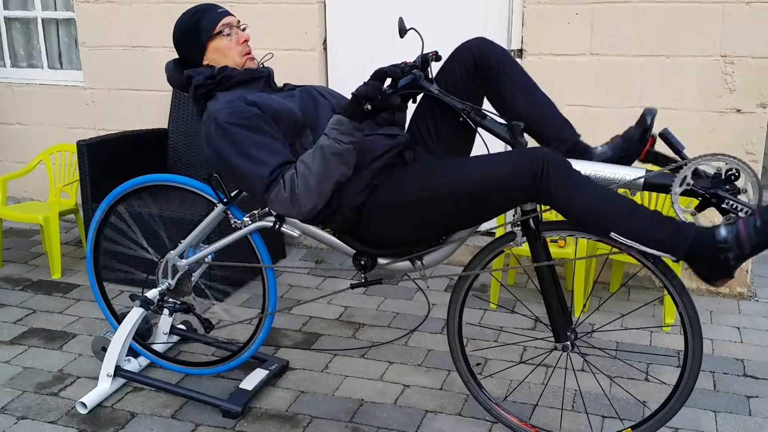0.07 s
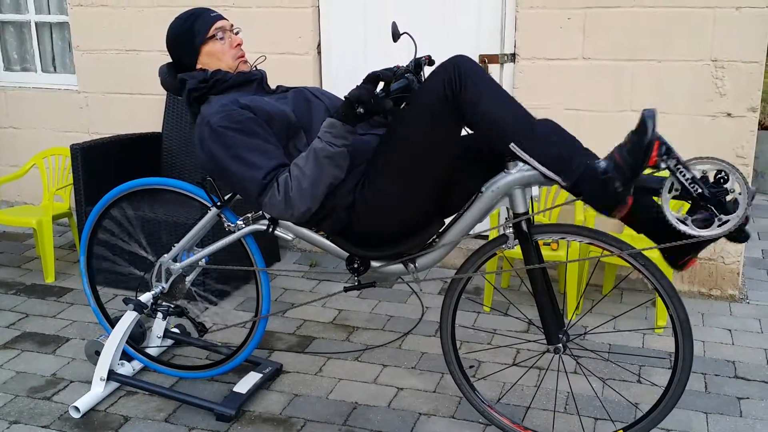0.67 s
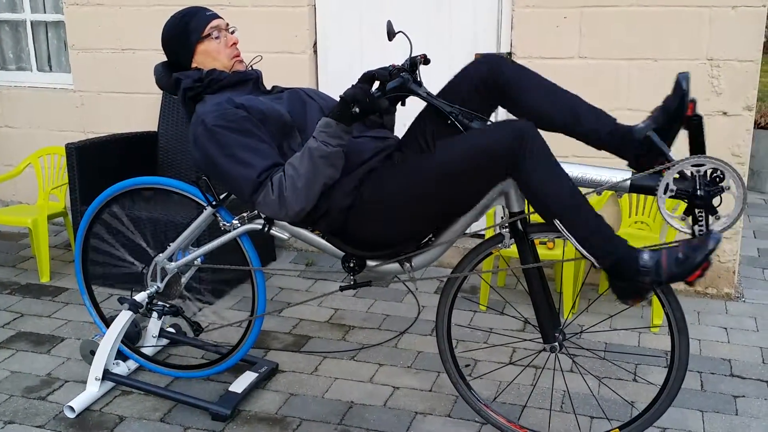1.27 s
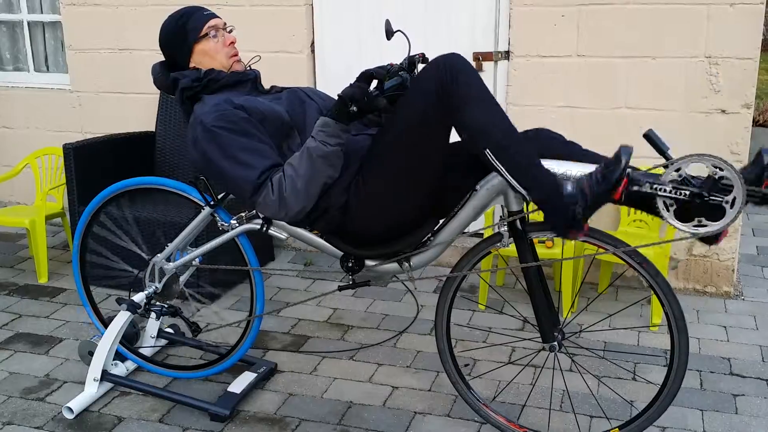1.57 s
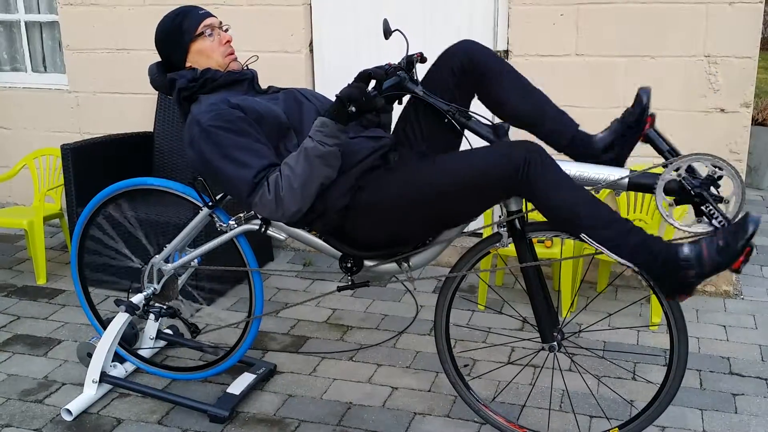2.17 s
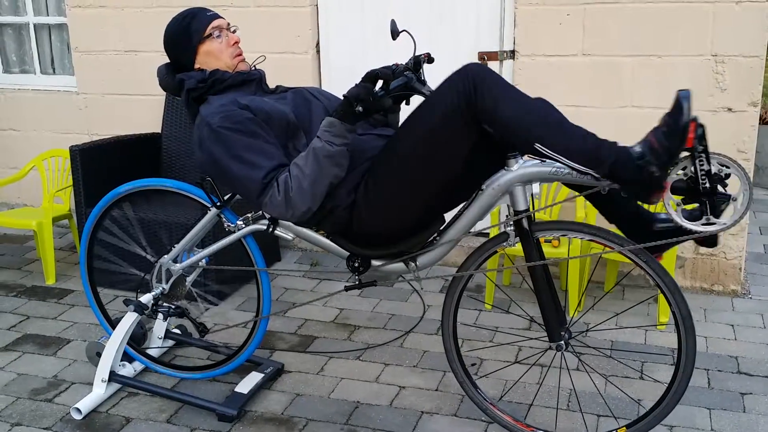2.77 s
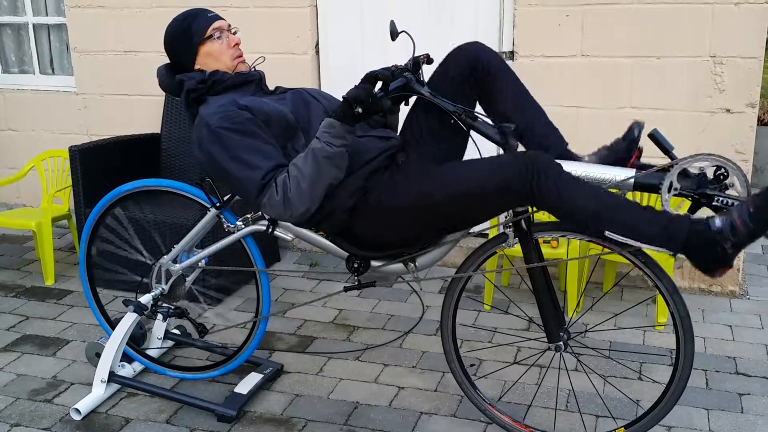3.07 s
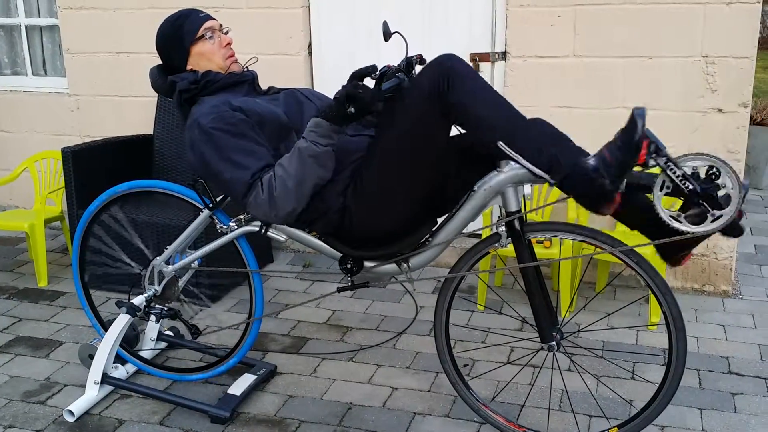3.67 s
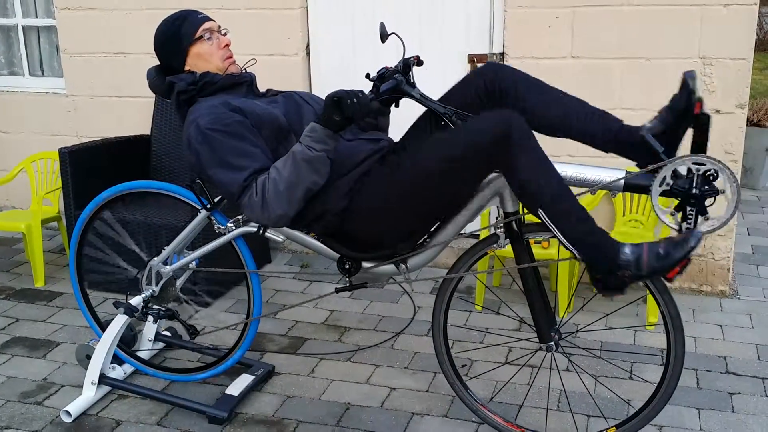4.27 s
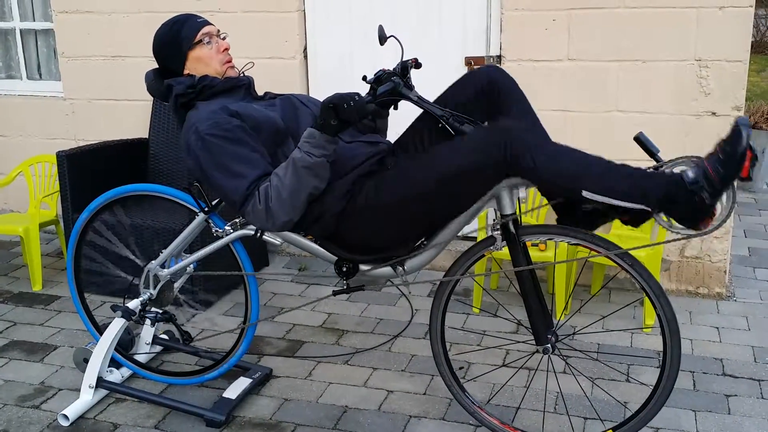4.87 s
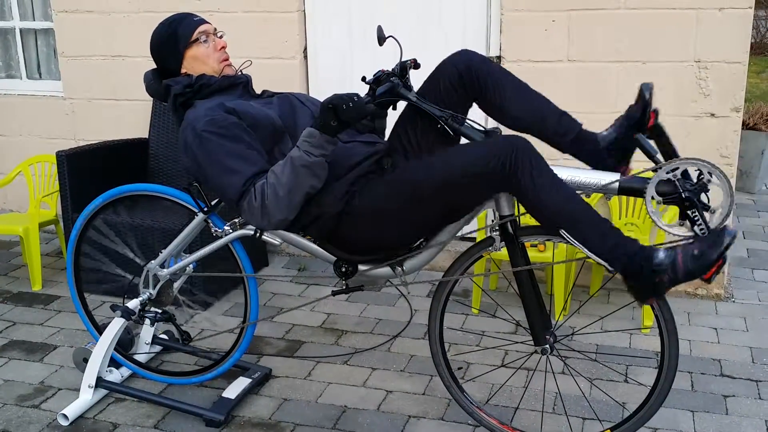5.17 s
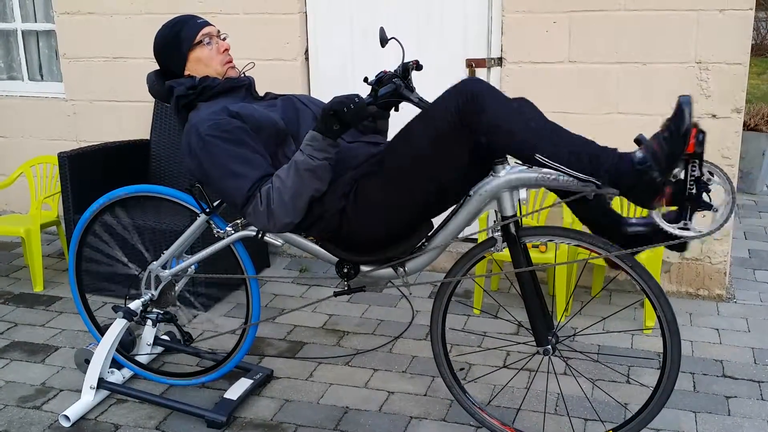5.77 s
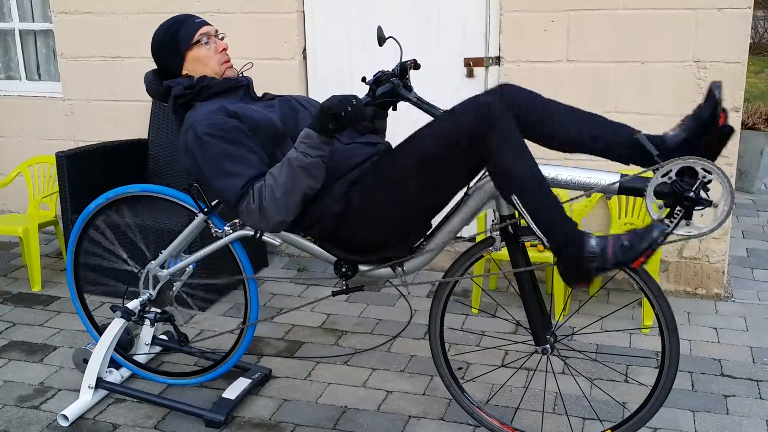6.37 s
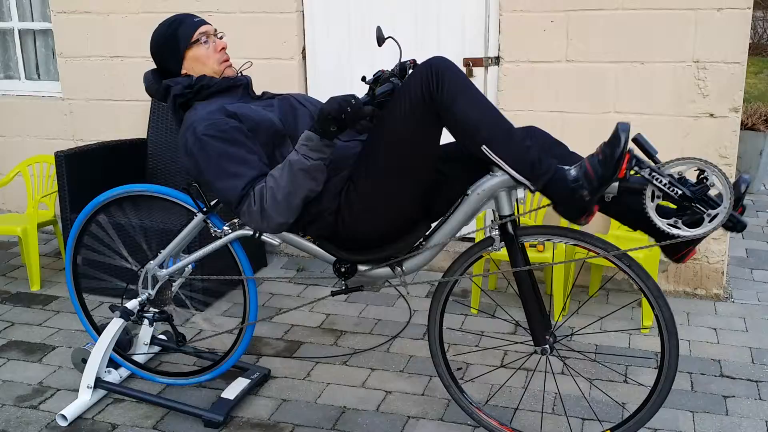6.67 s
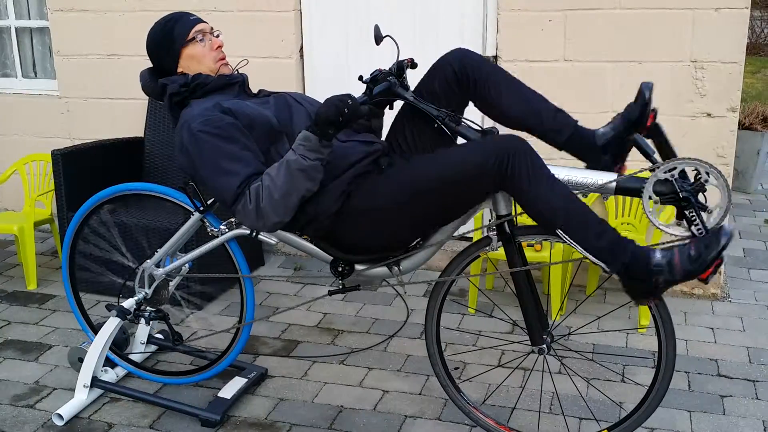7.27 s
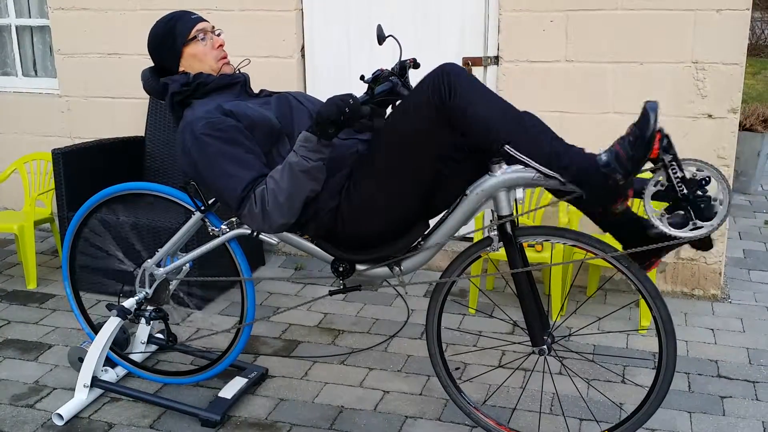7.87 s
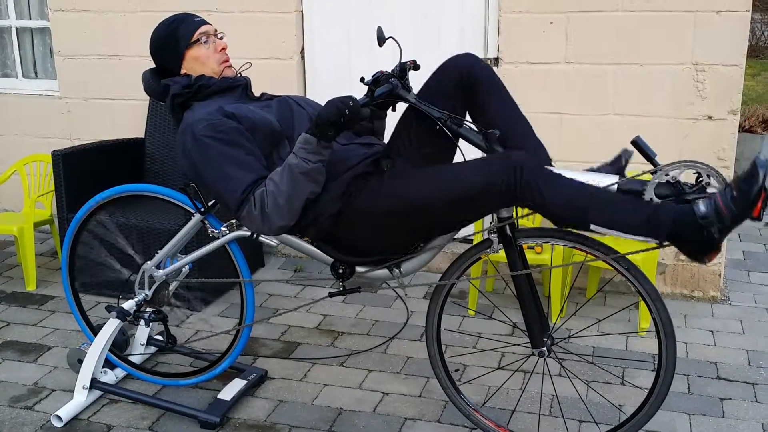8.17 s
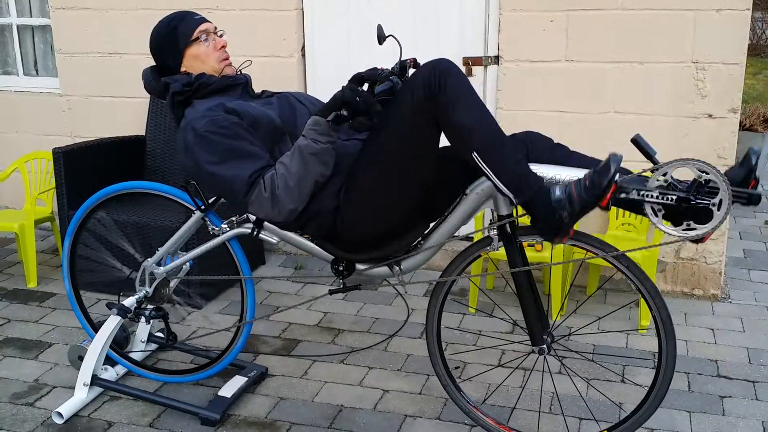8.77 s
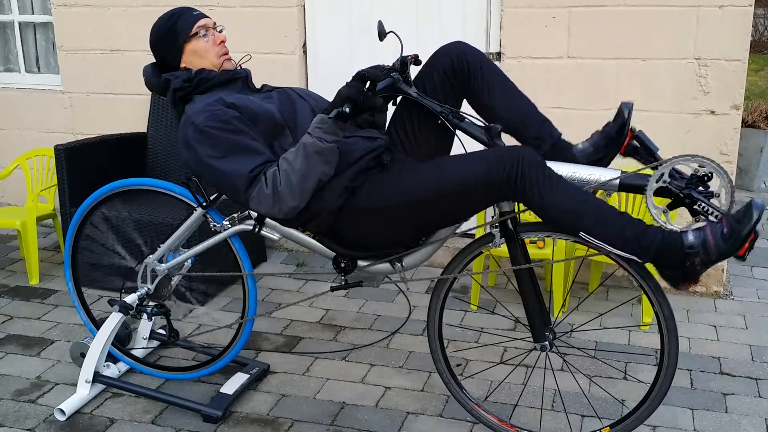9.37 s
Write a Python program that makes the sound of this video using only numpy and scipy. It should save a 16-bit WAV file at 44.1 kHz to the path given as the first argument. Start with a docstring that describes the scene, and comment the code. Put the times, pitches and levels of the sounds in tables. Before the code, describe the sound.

Wind gusts buffet the microphone over a bicycle whirring on a trainer, with ticking chain, sharp shifter snaps and clanks.

```python
"""In a paved yard, in front of a wall, wind blows over someone pedalling a recumbent bicycle on a trainer.
Gusts rumble in the microphone's two openings (ports), each in its own way. Single swirls of air (eddies)
slap the right port, and a limiter turns everything down under the strongest ones.
Beneath the wind the tyre whirs on the humming roller and the chain ticks over the sprockets.
The gear shifter snaps four times and the chain clanks across."""
import sys
import numpy as np
from scipy import signal
from scipy.fft import rfft, irfft, next_fast_len
from scipy.io import wavfile
from scipy.ndimage import uniform_filter1d, minimum_filter1d, map_coordinates

SR = 44100
rng = np.random.default_rng(int(sys.argv[2]) if len(sys.argv) > 2 else 0)


def log_audio(samples):
    """Write samples as a 16-bit WAV file to the path given in sys.argv[1]."""
    # one column per channel
    frames = np.atleast_2d(samples).T
    # limit to full scale, then quantise
    limited = np.clip(frames, -1, 1)
    pcm = np.round(limited * 32767).astype(np.int16)
    wavfile.write(sys.argv[1], SR, pcm)


N = 424241
TIME = np.arange(N) / SR
LEFT_LAG_S = .0005  # the bicycle's sound reaches the left port this much later

# The left port faces away and its hollow rings. Each row: pitch in Hz, dB compared with the right port.
LEFT_PORT = [(100, -9.5), (500, -2.5), (1300, -5), (2100, -10.5), (2900, -1), (3800, -1), (4900, 4.5),
             (6200, -2), (7700, -11), (10500, -13.5), (14000, -5)]
# How fast the chain runs. Each row: time in seconds, links passing per second.
LINK_RATE = [(0, 48.5), (1.85, 51), (2.2, 49), (3.9, 53), (7, 44.6), (8.6, 49)]
# The shifter's snaps. Each row: start in seconds, relative level in dB, ring of the left hollow in dB.
SNAPS = [(4.3365, -21.5, 4.5), (5.2932, -20.5, 5), (6.4577, -19, -0.5), (7.2786, -18.5, -20)]
# The chain hitting the sprockets.
# Each row: start in seconds, relative level in dB, boost of the low tones in dB, fade time in seconds.
CLANKS = [(4.4202, -37, -7.5, 0.0025), (4.564, -34, 8, 0.0019), (4.785, -35, 15.5, 0.0018),
          (5.878, -38, -1, .001), (6.0446, -40.5, -25, 0.002), (6.2563, -26.5, 17.5, 0.0059),
          (6.359, -33.5, 29, 0.0048), (6.379, -36, -8, 0.0046), (6.412, -33.5, 36, 0.0038),
          (6.5453, -37.5, 16, 0.0041), (6.902, -34.5, -8, 0.0025), (7.0189, -35, 0, 0.0037),
          (7.6106, -36, 13.5, 0.008), (7.703, -33.5, 13, 0.0047), (7.7116, -24, 16, 0.0042)]


def wind(port, gust_db, breeze_db=-0.52, speed_db=-0.74, breeze_speed_db=-1, quickening=.25):
    """Gusts ride on a breeze at one port (0 right, 1 left); harder air is louder and faster."""
    # Each row: start in seconds, length in seconds, then right level, left level and speed in relative dB.
    gusts = [(0.0, 0.076, -9.0, -23.0, -1.5), (0.14, 0.042, -11.0, -22.0, 1.5),
             (0.204, 0.13, -12, -30.5, 1.0), (0.361, 0.24, -17.0, -28.5, 2.0),
             (0.708, 0.028, -24, -12, 2.5), (0.753, 0.024, -16, -28, 4.5), (0.867, 0.11, -12.0, -22.5, 2.5),
             (0.97, 0.16, -19.5, -26.0, 3.5), (1.145, 0.11, -16.0, -30.0, 4.0),
             (1.299, 0.049, -21.5, -23.5, 5.0), (1.569, 0.13, -25.0, -42.0, 4.0),
             (2.02, 0.3, -20.5, -32.0, -0.5), (2.461, 0.21, -8, -17.5, -1.5),
             (2.67, 0.21, -12, -20.5, -0.5), (2.888, 0.19, -16, -25.5, 1.0),
             (3.109, 0.089, -18.0, -29.5, 2.0), (3.387, 0.11, -12.5, -32.5, -1.0),
             (3.631, 0.087, -13.0, -23.5, 0.0), (3.766, 0.059, -15.0, -18.0, -2.5),
             (3.859, 0.1, -21.0, -18.5, -3.0), (3.976, 0.18, -10.0, -19, 0.5),
             (4.117, 0.11, -13.0, -29.0, -1.5), (4.72, 0.27, -18.5, -35, -4.5),
             (5.024, 0.074, -23, -16.5, -1.5), (5.109, 0.11, -11, -16.0, -3),
             (5.22, 0.08, -27, -15.5, -3.0), (5.331, 0.25, -20, -27.0, -3.5),
             (5.808, 0.079, -24.5, -43, -3.5), (6.033, 0.051, -23.5, -16.5, -3.0),
             (7.356, 0.13, -17.5, -38, -3.5), (7.723, 0.027, -15, -29, -4),
             (8.295, 0.15, -21.5, -26.5, -7.5), (8.44, 0.048, -12, -29.5, 2.0),
             (8.558, 0.18, -16.5, -21, -2.5), (8.887, 0.12, -19.5, -39.5, -4),
             (9.467, 0.16, -13.5, -23, -1.5)]
    # The air between gusts. Each row: time in seconds, then right level and left level in relative dB.
    breeze = [(0, -25.5, -24), (1.42, -39, -36), (1.75, -30, -41), (2.4, -38, -39), (2.9, -17.5, -33),
              (3.58, -33, -27), (4.25, -22, -32), (4.45, -35, -44), (5.4, -23, -37), (5.7, -39.5, -43.5),
              (6.15, -27.5, -29.5), (6.55, -47.5, -55.5), (7.25, -51, -56.5), (7.5, -34, -40),
              (8.7, -29, -35), (9.62, -35.5, -40)]
    gust_power, weighted_pace = np.zeros((2, N))
    for start, length_s, *port_db, pace_db in gusts:
        power = (gain_of(port_db[port] + gust_db) * gust(length_s)) ** 2
        add(gust_power, start, power)
        add(weighted_pace, start, power * pace_db)
    gust_flap_db, breeze_flap_db = 1.4, 4.3
    flaps = np.clip(wander(hz=17), -2.5, 1)  # the air flaps at random
    breeze_power = gain_of(curve(breeze, column=port + 1) + breeze_db + breeze_flap_db * flaps) ** 2
    mean_pace_db = (weighted_pace + breeze_power * breeze_speed_db) / (gust_power + breeze_power)
    pressure = np.sqrt(gust_power * gain_of(gust_flap_db * flaps) ** 2 + breeze_power)
    flow_db = speed_db + mean_pace_db + quickening * (20 * np.log10(pressure) + 20)
    return pressure * eddies(flow_db, swirl_db=2.4, swirl_hz=85, leak_hz=78)


def gust(length_s, attack_s=.014, sag_db_per_s=12, release_db_per_s=520):
    """The strength of one gust: it hits quickly, sags while it blows and drops away."""
    age = TIME[:SR]
    fall_db = sag_db_per_s * age + release_db_per_s * np.maximum(age - length_s, 0)
    return np.minimum(age / attack_s, 1) * gain_of(-fall_db)


def eddies(speed_db, swirl_db, swirl_hz, leak_hz):
    """A fixed pattern of swirls blows past a port, the faster the brighter; its strength is held at 1."""
    # The rumble at a speed of 0 dB. Each row: pitch in Hz, relative level in dB.
    rumble = [(20, -4), (80, -4), (150, -4), (300, -12.5), (500, -22), (800, -33.5), (1300, -61),
              (2200, -86.5), (4000, -115)]
    swirl = gain_of(swirl_db * np.clip(wander(swirl_hz), -2.5, 2))
    size = 2 ** 19
    spectrum = gain_of(level_at(rumble, np.fft.rfftfreq(size, 1 / SR)))
    pattern = irfft(rfft(rng.standard_normal(size)) * spectrum)
    position = np.cumsum(gain_of(speed_db) * swirl) % (size - 1)
    pressure = map_coordinates(pattern, [position], order=3) * swirl
    leak = signal.butter(2, leak_hz, "high", fs=SR)  # slow pressure changes leak away
    pressure = signal.lfilter(*leak, pressure - pressure[0])
    power = uniform_filter1d(uniform_filter1d(pressure ** 2, size=1100), size=1100)
    return pressure / np.sqrt(abs(power) + 1e-12)


def air_slaps(level_db=-1, wake_db=-11, wake_s=0.0071, eddy_s=.00045):
    """An eddy hits as a pressure spike with a slower rebound, amid small swirls; narrower is brighter."""
    # Each row: time in seconds, relative level in dB, width of the spike in seconds.
    slaps = [(.022, 0, 0.00025), (.149, -5.5, 0.00019), (.160, 2.5, 0.00036), (.232, -0.5, 0.00015),
             (.254, -0.5, .00014), (.279, -2, 0.00015), (.312, -1.5, 0.00021), (.383, -5, .00016),
             (.493, -1, 0.00025), (.879, -1, 0.00019), (.896, 8, .00012), (.910, 3, .00014),
             (.924, -3, 0.00012), (.945, -1.5, .00016), (1.11, -11, 0.00013), (1.163, -3, 0.00029),
             (1.329, -6, 0.00023), (2.478, 2.5, 0.00058), (2.497, -4, 0.00036), (2.594, 4.5, 0.00024),
             (2.627, 5, 0.00029), (2.762, -11, 0.00036), (3.476, -5.5, 0.00036), (4.066, -2.5, .00038),
             (4.09, 0, .00015), (4.635, -5.5, 0.00081), (4.737, 1.5, 0.00064), (4.755, -2.5, 0.00051),
             (4.939, -1.5, 0.00049), (4.972, -4.5, 0.00059), (5.123, 1, 0.0004), (5.192, 1.5, 0.00035),
             (7.49, -7, .0005), (8.098, -2.5, 0.00039), (8.315, -4.5, .0012), (8.508, 0, 0.00041),
             (8.533, -4, .0003), (9.012, -3, 0.00049)]
    spikes, wakes = np.zeros((2, N))
    for centre_s, db, width_s in slaps:
        near = abs(TIME - centre_s) < 5 * wake_s
        age = TIME[near] - centre_s
        widths = np.clip(age / width_s, -20, 20)
        spike = 1 / np.cosh(widths) - .5 / np.cosh(widths / 2 - 1.5)
        spikes[near] += gain_of(db) * rng.choice([-1, 1]) * spike
        wakes[near] += gain_of(db + wake_db) * np.exp(-(age / wake_s) ** 2)
    speed_db = 20 * np.log10(eddy_s / curve(slaps, column=2))
    swirls = eddies(speed_db, swirl_db=1.52, swirl_hz=221.6, leak_hz=147)
    return gain_of(level_db) * (spikes + wakes * swirls)


def shifter(contact_db=1.0, ring_db=-7, rise_s=0.0022, hollow_hz=(3300, 5400), ripple_db=1.0):
    """The sprung lever snaps into its next notch and rings; the left port's hollow rings along."""
    # The lever's tones. Each row: pitch in Hz, relative level in dB, seconds to fade by 60 dB.
    tones = [(2291, 6.5, 0.044), (4025.5, -8, 0.055), (4400, -15, 0.04), (6530, 9, 0.032)]
    # The noise of the snap. Each row: pitch in Hz, relative level in dB.
    click = [(200, -8), (1000, -2), (2400, 7.5), (2850, 4.5), (3600, 6.5), (6600, 4), (7500, 1.5),
             (10500, -2), (14500, -16)]
    out, age = np.zeros((2, N)), TIME[:SR // 4]
    lever = sum(gain_of(db - 60 * age / t60) * np.sin(2 * np.pi * (hz * age + rng.random()))
                for hz, db, t60 in tones)
    lever = gain_of(ring_db) * np.minimum(age / rise_s, 1) * lever
    ring = np.array([colour(lag_left(lever), lambda hz: level_at(LEFT_PORT, hz)), lever])
    hollow = signal.butter(3, hollow_hz, "band", fs=SR)
    reflection_s = .00156  # a close echo lifts some pitches and dips others
    tone = lambda hz: level_at(click, hz) - ripple_db * np.cos(2 * np.pi * hz * reflection_s)
    for start, db, hollow_db in SNAPS:
        contact = metal_hit(tone, hold_s=.0026, decay_s=.0012, tail_db=-8.5, tail_s=.16)
        left, right = gain_of(db) * (gain_of(contact_db) * contact + ring)
        add(out[0], start, left)
        add(out[0], start + LEFT_LAG_S, gain_of(hollow_db) * signal.lfilter(*hollow, right))
        add(out[1], start, right)
    return out


def sprockets(level_db=5.0, body_hz=3000):
    """The chain climbs and drops onto the next sprocket; heavy drops shake the wheel too."""
    # The noise of chain on sprocket. Each row: pitch in Hz, relative level in dB.
    metal = [(150, 22), (600, 2.5), (1100, 11.5), (1600, 0), (3400, 7), (6200, 7), (10400, 14), (14500, 3)]
    # Where the sprockets ring. Each row: pitch in Hz, width in Hz, boost in dB.
    peaks = [(1050.4, 40, 11), (2147.3, 497, 9.5)]
    out = np.zeros((2, N))
    for start, db, body_db, decay_s in CLANKS:
        tone = lambda hz: level_at(metal, hz) + boost_at(peaks, hz) + body_db / (1 + (hz / body_hz) ** 4)
        clank = metal_hit(tone, hold_s=.0006, decay_s=decay_s, tail_db=-1, tail_s=.14)
        for port, sound in zip(out, clank):
            add(port, start, gain_of(db + level_db) * sound)
    return out


def metal_hit(tone, hold_s, decay_s, tail_db, tail_s):
    """Metal strikes metal in a burst of noise, with strength 1 over its loudest 4 milliseconds."""
    force = np.exp(-np.maximum(TIME[:SR // 4] - hold_s, 0) / decay_s)
    sound = yard_noise(force, tone, tail_db, tail_s, echo_db=0.5)
    power = uniform_filter1d((sound ** 2).mean(0), size=176, mode="constant")
    return sound / np.sqrt(power.max())


def tyre(level_db=20.0, roughness=0.48, rough_hz=120):
    """The tread whirs on the roller and makes the wheel and the stand ring."""
    # The whir. Each row: pitch in Hz, relative level in dB.
    whir = [(30, -10), (100, 6), (190, 0.5), (400, -1.5), (560, -4.5), (1100, -2.5), (2350, -3.5),
            (2900, -13.5), (4000, -18), (9000, -25.5)]
    # Where the wheel and stand ring. Each row: pitch in Hz, width in Hz, boost in dB.
    peaks = [(157.6, 21.6, 16), (236.6, 44.5, 11.5), (300, 37, 8.5), (338, 37, 12.5), (808, 52, 7.5),
             (1058, 120, 6.5), (1734, 29, 8.5), (1909, 55, 7.5)]
    tread = 1 + roughness * wander(rough_hz)
    tone = lambda hz: level_at(whir, hz) + boost_at(peaks, hz)
    sound = yard_noise(tread, tone, tail_db=7.0, tail_s=0.2, echo_db=-5.5)
    return heard_level() * gain_of(level_db) * evened(sound)


def roller(level_db=8, hum_hz=153, octave_db=-2, waver=0.02536, waver_hz=14):
    """The spinning roller hums; the uneven tyre makes its pitch and strength waver."""
    cycles = np.cumsum(hum_hz * (1 + waver * wander(waver_hz))) / SR
    tone = np.sin(2 * np.pi * cycles) + gain_of(octave_db) * np.sin(4 * np.pi * cycles)
    hum = heard_level() * gain_of(level_db) * tone * (1 + wander(waver_hz))
    return np.array([hum * gain_of(level_at(LEFT_PORT, hum_hz)), hum])


def chain(level_db=7, inner_link_db=-11, scatter_db=2, tick_s=0.0012,
          rattle_db=-2, rattle_scatter_db=4, rattle_per_s=40):
    """Links tick onto the teeth, outer ones harder; during the run of gear changes the chain rattles."""
    # The running chain. Each row: pitch in Hz, relative level in dB.
    hiss = [(500, -35), (2000, 3.5), (2400, 4), (3500, -32), (4700, 1.5), (5600, -4.5), (6600, 1.5),
            (7800, 1.5), (8800, -2.5), (10300, -0.5), (12300, -8), (13300, -29), (14500, -22)]
    # The chain's smooth sliding. Each row: time in seconds, dB compared with the ticks.
    sliding = [(3.9, -6), (8, -2.5)]
    sway = 1 + .018 * wander(hz=5)
    link = np.floor(np.cumsum(curve(LINK_RATE) * sway) / SR)
    chance = rng.standard_normal(N)
    landings = np.diff(link, prepend=0) * gain_of(inner_link_db * (link % 2) + scatter_db * chance)
    shifting = (TIME > SNAPS[0][0]) & (TIME < CLANKS[-1][0])
    knocks = shifting * (rng.random(N) < rattle_per_s / SR)
    rattle = knocks * gain_of(rattle_db + rattle_scatter_db * chance)
    ticks = evened(signal.oaconvolve(landings + rattle, np.exp(-TIME[:SR // 20] / tick_s))[:N])
    slide = gain_of(curve(sliding))
    force = (ticks + slide) / np.hypot(1, slide)
    sound = yard_noise(force, lambda hz: level_at(hiss, hz), tail_db=-2, tail_s=.15, echo_db=1)
    return heard_level() * gain_of(level_db) * evened(sound)


def heard_level(push_db=1.8, chainring_teeth=50, push_at_turns=.48):
    """How loud the bicycle is heard: turned down by the recorder in the opening wind,
    back up after two seconds, and surging with each leg's push."""
    # The level the recorder lets through. Each row: time in seconds, relative level in dB.
    recorder_level = [(0, -65.5), (.6, -72.5), (1.6, -71.5), (2.3, -59.5), (2.75, -63.5), (3.45, -64),
                      (3.9, -59.5), (5.1, -61.5), (5.5, -59), (6.9, -58.5), (7.9, -60), (8.9, -59),
                      (9.15, -59.5), (9.62, -59)]
    turns = np.cumsum(curve(LINK_RATE)) / SR / chainring_teeth
    return gain_of(curve(recorder_level) + push_db * np.cos(4 * np.pi * (turns - push_at_turns)))


def yard_noise(force, tone, tail_db, tail_s, echo_db):
    """Noise follows a contact force; both ports share the direct sound, but each gets its own echoes."""
    # Echoes from paving and wall. Each row: delay in seconds, relative level in dB.
    echoes = [(.0035, -8.5), (.0088, -11.5)]
    tail = gain_of(-60 * TIME[:SR // 4] / tail_s) ** 2
    echo_power = gain_of(tail_db) ** 2 * tail / tail.sum()
    for delay_s, db in echoes:
        echo_power[round(delay_s * SR)] += gain_of(db + echo_db) ** 2
    scattered = np.sqrt(abs(signal.oaconvolve(force ** 2, echo_power)[:len(force)]))
    direct = force * rng.standard_normal(len(force))
    left, right = np.array([lag_left(direct), direct]) + scattered * rng.standard_normal((2, len(force)))
    return np.array([colour(left, lambda hz: tone(hz) + level_at(LEFT_PORT, hz)), colour(right, tone)])


def lag_left(sound):
    """Delays a sound on its way to the left port."""
    return np.pad(sound, (round(LEFT_LAG_S * SR), 0))[:len(sound)]


def gain_of(db):
    """Turns dB into a number to multiply by."""
    return 10 ** (np.asarray(db) / 20)


def evened(x):
    """Scales a signal to an average strength (rms) of 1."""
    return x / np.sqrt(np.mean(x ** 2) + 1e-20)


def curve(rows, column=1):
    """One column of a table, joined by straight lines in time."""
    columns = np.transpose(rows)
    return np.interp(TIME, columns[0], columns[column])


def level_at(rows, hz):
    """The dB at any pitch, sliding between a table's rows."""
    pitches, db = np.transpose(rows)
    return np.interp(np.log(hz + 1), np.log(pitches + 1), db)


def boost_at(peaks, hz):
    """The dB that an object's ringing adds at any pitch."""
    return sum(db / (1 + (2 * (hz - centre_hz) / width_hz) ** 2) for centre_hz, width_hz, db in peaks)


def colour(x, tone, size=8192):
    """Turns each pitch up or down by tone(hz) dB, with no ringing ahead of the sound."""
    log_gain = np.log(gain_of(tone(abs(np.fft.fftfreq(size, 1 / SR)))))
    response = np.exp(np.conj(signal.hilbert(log_gain)))
    taps = np.fft.ifft(response).real[:size // 2]
    return signal.oaconvolve(x, taps)[:len(x)]


def wander(hz):
    """A random drift of strength 1 that wobbles up to about hz times a second."""
    size = next_fast_len(N)
    rolloff = 1 + (np.fft.rfftfreq(size, 1 / SR) / hz) ** 4
    return evened(irfft(rfft(rng.standard_normal(size)) / rolloff)[:N])


def add(mix, start_s, sound):
    """Mixes a sound in at its start time."""
    part = mix[round(start_s * SR):][:len(sound)]
    part += sound[:len(part)]


def scene():
    """Wind at each port, over the sounds of the bicycle."""
    right = wind(port=0, gust_db=-1.5) + air_slaps()
    left = wind(port=1, gust_db=-0.16)
    return np.array([left, right]) + tyre() + roller() + chain() + shifter() + sprockets()


def record(dry, ceiling_db=-1, recovery_db_per_s=130, top_hz=14900):
    """A limiter briefly turns everything down at the loudest peaks; then the highest treble is cut."""
    over_db = np.maximum(20 * np.log10(abs(dry).max(0) + 1e-9) - ceiling_db, 0)
    recovery_db = recovery_db_per_s * TIME
    duck_db = recovery_db - np.maximum.accumulate(over_db + recovery_db)
    limited = dry * gain_of(uniform_filter1d(minimum_filter1d(duck_db, size=128), size=128))
    treble_cut = signal.firwin(255, top_hz, window=("kaiser", 8), fs=SR)
    return signal.oaconvolve(limited, treble_cut[None], "same", axes=1)


dry = scene()
out = record(dry)
log_audio(out)
```